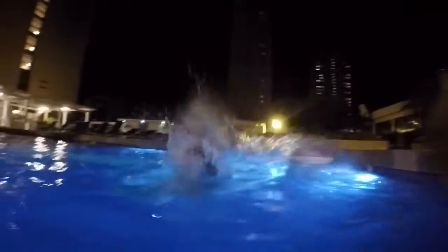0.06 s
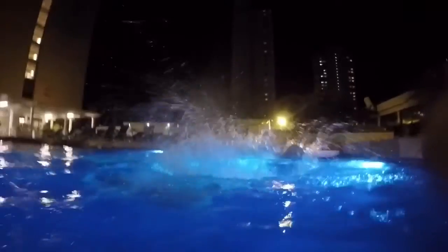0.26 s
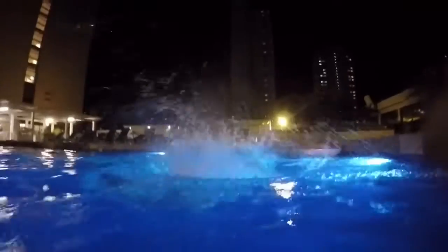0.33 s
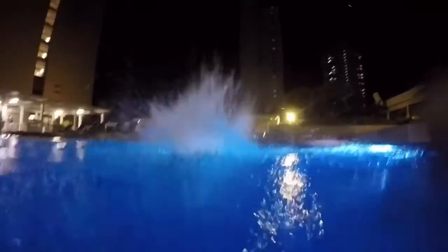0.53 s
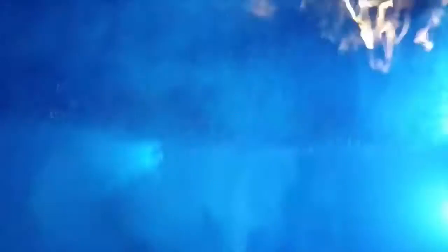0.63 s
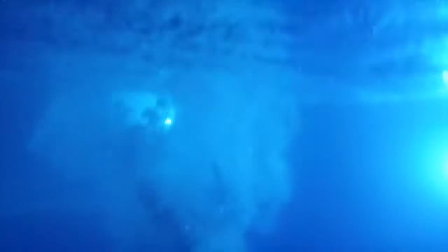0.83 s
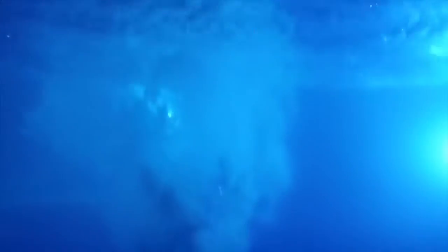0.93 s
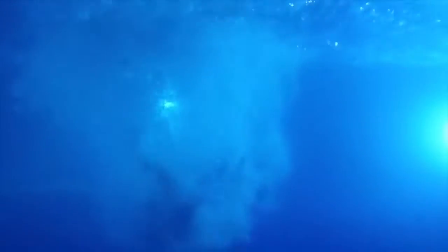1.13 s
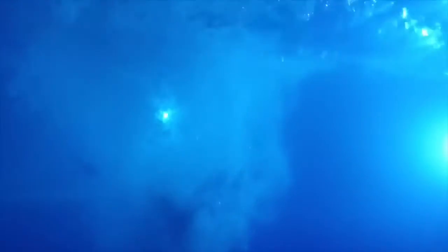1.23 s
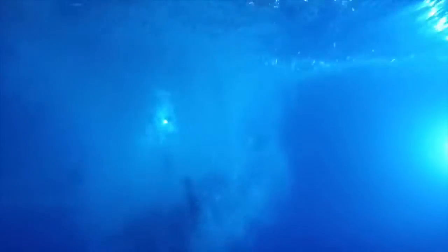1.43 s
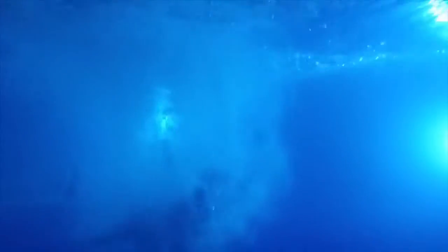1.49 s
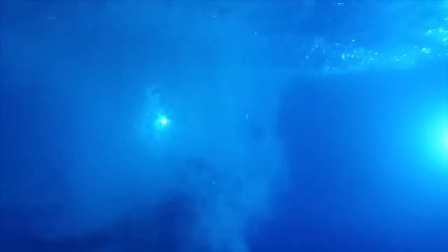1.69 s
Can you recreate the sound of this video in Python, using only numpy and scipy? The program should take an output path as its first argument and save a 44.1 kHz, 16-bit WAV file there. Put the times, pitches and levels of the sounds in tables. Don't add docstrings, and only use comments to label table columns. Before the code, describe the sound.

Pool splash at very close range: rushing spray, then thudding, clicking water slaps that overload the cased microphone, a gulp of trapped air as it submerges, and finally a faint, dull underwater bubbling that slowly grows.

```python
import sys
import numpy as np
from scipy import signal
from scipy.fft import rfft, irfft
from scipy.io import wavfile
from scipy.ndimage import uniform_filter1d, map_coordinates

SR = 44100
rng = np.random.default_rng(int(sys.argv[2]) if len(sys.argv) > 2 else 0)


def master_out(mix):
    frames = np.transpose(np.atleast_2d(mix))
    ceiling = np.clip(frames, -1, 1)
    pcm = np.round(ceiling * 32767).astype(np.int16)
    wavfile.write(sys.argv[1], SR, pcm)


def invert_db(level):
    return 10 ** (np.asarray(level, dtype=float) / 20)


N = 77175


def unit(x):
    return x / np.sqrt(np.mean(x ** 2) + 1e-20)


def along(points, hz):
    f, value = np.transpose(points)
    return np.interp(np.log(hz + 1), np.log(f + 1), value)


def level(s, db):
    times = np.r_[s[0] - .1, s, s[-1] + .1]
    return invert_db(np.interp(np.arange(N) / SR, times, np.r_[-90, db, -90]))


def wobble(rate):
    knots = rng.standard_normal(int(N * rate / SR) + 4)
    return map_coordinates(knots, [np.arange(N) * rate / SR])


def wash(tone, side, patchy_db):
    z = signal.stft(rng.standard_normal((2, N)), nperseg=256)[2]
    field = uniform_filter1d(rng.standard_normal(z.shape[1:]), size=3, axis=0)
    field = uniform_filter1d(field, size=6, axis=1)
    pair = signal.istft(z * invert_db(patchy_db * unit(field)), nperseg=256)[1][:, :N]
    hz = np.fft.rfftfreq(N, 1 / SR)
    pair = irfft(rfft(pair) * invert_db(along(tone, hz) + [0 * hz, along(side, hz)]), N)
    return pair / np.sqrt(np.mean(pair[0] ** 2))


def rings(s, db, hz, t60, swell, glide=0.):
    t = np.arange(int(min(np.max(t60), .4) * SR)) / SR
    s, db, hz, t60 = (np.reshape(v, (-1, 1)) for v in (s, db, hz, t60))
    shape = (1 - np.exp(-(t * hz / swell) ** 2)) * invert_db(db - 60 * t / t60)
    shape *= invert_db(db) / shape.max(axis=1, keepdims=True)
    wave = shape * np.sin(2 * np.pi * hz * t * (1 + glide * t / t60))
    at = (s * SR).astype(int) + np.arange(len(t))
    return np.bincount(at.ravel(), wave.ravel(), N + SR)[:N]


def swarm(count, hz, spread, cycles, scatter_db, t0, t1):
    u, g = rng.random((count, 2)), rng.standard_normal(count)
    f = hz * np.exp(spread * np.clip(g, -2, 2))
    start = t0 + (t1 - t0) * u[:, 0]
    db = -scatter_db * np.log(1 - u[:, 1])
    x = rings(start, db, f, 2 * cycles / f, swell=1.9, glide=0.033)
    return unit(x) * np.sqrt((t1 - t0) * SR / N)


def bursts(s, db, t60, tone, rise_s):
    spikes = np.bincount((s * SR).astype(int), invert_db(db), N)
    t = np.arange(SR // 20) / SR
    decay = invert_db(-60 * t / t60) * (1 - np.exp(-(t / rise_s) ** 2))
    shape = np.convolve(spikes, decay)[:N]
    return shape * invert_db(4 * wobble(500)) * wash(tone, [(1000, 0)], patchy_db=3)


# t/s, wash level/dB, treble level/dB
SPRAY = [(0, -28.5, 2.5), (.21, -31.5, 1), (0.239, -28.5, -20.5), (.3, -37.5, -4), (0.401, -20.5, -12),
         (.42, -26.5, -12.5), (.443, -25.5, -12), (0.461, -22.5, -5), (.5, -25, -8), (.62, -35, -9),
         (0.701, -44, -4.5), (0.779, -51.5, -14.5), (.88, -63.5, -10.5), (1.001, -66.5, -2)]
# f/Hz, density/dB per Hz
SPRAY_TONE = [(300, -19), (600, 1.5), (1050, -4.5), (2100, 2.5), (2900, -8.5), (3600, -57.5)]
HISS_TONE = [(2600, -30), (3300, 1.5), (7000, -7), (9500, -22), (15000, -32), (16000, -83.5)]
# f/Hz, side over mid/dB
SPRAY_SIDE = [(550, -2.5), (1080, 12.5), (1900, -4), (6000, 2)]


def spray():
    s, db, treble_db = np.transpose(SPRAY)
    drops = invert_db(-3.5) * np.array([swarm(count=260, hz=1839, spread=.3, cycles=8.7, scatter_db=3.5,
                                        t0=0.19, t1=.9) for port in range(2)])
    fizz = invert_db(-13.0) * swarm(count=90, hz=5600, spread=0.39, cycles=11, scatter_db=5.0, t0=0.27, t1=0.67)
    hiss = wash(HISS_TONE, SPRAY_SIDE, patchy_db=4.0) + fizz * [[1], [-1]]
    hiss = level(s, db + treble_db - 11.0) * hiss
    body = level(s, db) * (wash(SPRAY_TONE, SPRAY_SIDE, patchy_db=3.0) + drops)
    choppy_db = np.where(np.arange(N) / SR < s[1], 1.5, 2.5)
    return invert_db(choppy_db * wobble(55.07)) * (body + hiss)


# t/s, level/dB
CHURN = [(0, -29.5), (.2, -23), (.25, -19.5), (0.295, -22), (0.359, -13.5), (0.411, -13.5), (.44, -20),
         (.47, -18), (0.581, -19.5), (0.629, -22.5), (.72, -36), (.8, -27), (.95, -43), (1.202, -38.5),
         (1.75, -36.5)]
# f/Hz, density/dB per Hz
CHURN_TONE = [(15, -10.5), (40, -6.5), (180, -7), (320, -8.5), (500, -23.5), (900, -85.5)]
# f/Hz, side over mid/dB
CHURN_SIDE = [(40, -29), (250, -13.5), (500, -2)]


def churn():
    above = np.clip((.95 - np.arange(N) / SR) * 10, 0, 1)
    lumps = invert_db(2.4 * wobble(30))
    surge = level(*np.transpose(CHURN)) * lumps
    return surge * wash(CHURN_TONE, CHURN_SIDE, patchy_db=2.44) * [1 + 0 * above, above]


# t/s, peak level/dB, f/Hz
PLINKS = [(0.179, -17.5, 2180), (0.205, -4, 1960), (0.217, 0, 1727), (.219, -9.5, 661), (0.224, -12, 1674),
          (.243, -11, 1845), (0.255, -6, 1016), (0.264, -5, 1670), (0.271, -8, 1075), (0.283, -16, 1950),
          (0.303, -14.5, 1154), (.328, -23, 2270), (0.335, -6.5, 1510), (0.337, -4, 2187),
          (0.3699, -15, 1940), (0.381, -14, 1920), (.4, -10, 1700), (0.406, -2, 1700), (0.409, -1, 2250),
          (0.4483, -12.5, 2570), (0.452, 1.5, 1894), (0.458, 0.5, 2020), (0.468, -6, 2860),
          (.476, -5, 1970), (0.4876, 2, 2410), (.501, -12.5, 1900), (0.511, -8, 1780), (0.5503, -16, 1600),
          (.553, -14, 722), (0.564, -10, 814), (0.586, -5.5, 875), (0.615, -14.5, 1023),
          (0.638, -10.5, 1730), (0.661, -8, 961), (0.714, -38, 1270), (0.731, -24, 2577),
          (0.7444, -17, 1260), (0.762, -31, 2130), (.797, -30.5, 2620), (0.861, -34, 2300),
          (0.762, -19.5, 1610), (0.8, -21.5, 1806), (0.849, -18, 1857), (0.864, -19.5, 1490),
          (0.915, -15.5, 1476), (0.961, -22, 1793)]
# t/s, peak level/dB, f/Hz
ROCKS = [(0.217, 4, 862), (.255, -2.5, 1034), (0.262, 0, 974), (0.27, -0.5, 973), (0.303, -4.5, 1045),
         (.332, -13, 870), (0.339, -2, 1165), (0.357, -9.5, 903), (.374, -15, 795), (.400, -4.5, 961),
         (.408, -3, 805), (0.414, 3, 1070), (.451, -8.5, 1136), (0.469, -5.5, 336), (0.511, 4, 1092),
         (0.567, -2, 877), (0.587, -5.5, 838), (.657, -2, 683), (0.664, -15, 306), (.744, -12.5, 570),
         (.866, -12.5, 913)]
# t/s, peak level/dB, f/Hz
THUDS = [(0.2195, 0.5, 209.4), (0.2248, -5, 188), (.237, -11, 176), (0.2549, -9, 172), (0.2678, 1.5, 181),
         (0.306, -19, 170), (0.337, -10, 394), (0.35, -7.5, 203), (0.362, -6.5, 317), (0.382, -11.5, 306),
         (0.39, -6, 256.3), (0.402, -9, 174.2), (0.409, -0.5, 244), (0.457, -4, 208), (0.5121, -2.5, 207),
         (.525, -13.5, 226), (0.539, -16, 151), (0.565, -4, 173), (0.586, -3.5, 177)]
# t/s, peak level/dB,
# f/Hz, decay T60/s
GULPS = [(.469, -1.5, 305, .07), (.384, -6, 270, .04), (.739, -18, 340, 0.035), (.777, -38, 1760, 0.047),
         (.814, -31, 1100, 0.084), (.868, -23, 1530, 0.04), (.86, -33, 580, 0.24), (.776, -22, 520, 0.1),
         (.82, -21.5, 460, 0.19), (.9, -30.5, 282, 0.34), (1.17, -34, 570, 0.063),
         (1.213, -35.5, 490, 0.066), (1.733, -28.5, 490, 0.046), (1.515, -32, 410, 0.21),
         (1.655, -26.5, 576, 0.043), (.653, -5.5, 318, 0.025), (.659, 6.5, 300.6, 0.061),
         (.744, -4, 425, 0.1), (.748, -10.5, 327, 0.12), (.763, -16, 433, 0.13), (.805, -17, 413, 0.22),
         (.79, -20.5, 189, 0.19), (.95, -27, 503, 0.235), (1.036, -14, 295, 0.086), (1.67, -25, 43, 0.13),
         (.972, -41, 2900, 0.025), (1.013, -53.5, 3400, 0.031), (1.318, -50, 3260, 0.031),
         (1.368, -35, 970, 0.19), (1.43, -28.5, 28, 0.43), (1.54, -23.5, 537, 0.3),
         (1.597, -18.5, 580, 0.11), (1.687, -43, 400, 0.047)]


def slaps():
    s, db, hz = np.transpose(THUDS)
    thuds = rings(s, db, hz, 6 / hz, swell=0.35)
    gulps = rings(*np.transpose(GULPS), swell=0.44) * invert_db(1.1 * wobble(70.4))
    s, db, hz = np.transpose(ROCKS)
    rocking = rings(s, db, hz, 30 / hz, swell=0.59, glide=0.018)
    s, db, hz = np.transpose(PLINKS)
    t60 = 27 / hz
    plinks = rings(s, db - 4.0, hz, t60, swell=2.2, glide=0.0063)
    side_plinks = rings(s, db - 7.0, hz * 0.96, 0.25 * t60, swell=1.2)
    mid = thuds + gulps - 0.22 * rocking + plinks
    side = rocking + side_plinks
    crackle_tone = [(400, -25), (750, -2), (2400, -4), (3600, -22), (9000, -60)]  # f/Hz, dB per Hz
    return np.array([mid, side]) + bursts(s, db - 10, .018, crackle_tone, rise_s=.001)


# t/s, peak level/dB, f/Hz
TICKS = [(0.2174, -12, 4400), (0.255, -22, 4220), (.267, -31, 6130), (.3051, -36, 4050),
         (.3215, -31.5, 3920), (0.3371, -25.5, 3820), (0.3985, -17, 3930), (0.4104, -21, 4590),
         (.414, -28, 4520), (.4512, -25, 4510), (.4635, -18.5, 6410), (.481, -16.5, 5790),
         (.501, -9.5, 5600), (0.4579, -28, 3850), (0.4693, -6.5, 5270), (0.4874, -15.5, 5600),
         (0.4968, -3, 5900), (0.5064, -7.5, 4840), (.511, -23, 6000), (.519, -23.5, 5840),
         (.533, -23.5, 5630), (.56, -27, 6150), (.565, -24.5, 4500), (.595, -28.5, 4350),
         (.612, -35.5, 6500), (.625, -31.5, 3800), (.65, -32.5, 7200), (.702, -42.5, 5600),
         (.729, -38.5, 4330), (.897, -48, 4300), (1.5543, -53, 2800), (1.5733, -48, 3800),
         (1.7025, -41.5, 3000), (0.5392, -28, 4300), (0.5544, -26, 5870), (0.5881, -24, 4290),
         (0.615, -23.5, 3780), (0.6584, -23.5, 4210), (0.8699, -38.5, 4360), (0.9143, -33, 9640)]


def ticks():
    s, db, hz = np.transpose(TICKS)
    ring = rings(s, db - 6.5, hz, 0.011 + 0 * s, swell=1.2)
    wash_tone = [(1500, -21), (3500, 6.0), (8000, 4.5), (10500, -13), (15600, -12), (16000, -78.0)]
    return ring * [[1], [-.7]] + bursts(s, db - 9, 0.015, wash_tone, rise_s=0.00025)


# t/s, level/dB
GURGLE = [
    (.8, -34),
    (.97, -46),
    (1.099, -46),
    (1.3, -40.5),
    (1.449, -35.5),
    (1.551, -32.5),
    (1.75, -31.5),
]
# f/Hz, density/dB per Hz
UNDER_TONE = [(200, -28.5), (330, -14.5), (580, -2), (1000, -20.5), (1300, -31.5), (2100, -37.5),
              (2500, -41.5), (10500, -63), (14500, -73.5)]
# f/Hz, side over mid/dB
UNDER_SIDE = [(300, -57), (600, -54), (1100, -14), (2500, -28.5)]


def gurgle():
    big = swarm(count=160, hz=590.3, spread=.07, cycles=100, scatter_db=2.5, t0=0.66, t1=2.4)
    small = sum(swarm(count=240, hz=hz, spread=.035, cycles=30, scatter_db=1.5, t0=.9, t1=1.74)
                for hz in (1600, 2050))
    both = invert_db(-7) * big + invert_db(-23) * small
    muffled = wash(UNDER_TONE, UNDER_SIDE, patchy_db=2.5) + [both, 0 * both]
    return level(*np.transpose(GURGLE)) * invert_db(1.3 * wobble(33)) * muffled


# f/Hz, density/dB per Hz
FLOOR_TONE = [(3000, -29.5), (7000, -7), (10000, 3), (12500, -9.5), (14000, -41)]


def input_hiss():
    return level([1, N / SR], [-81, -72]) * wash(FLOOR_TONE, UNDER_SIDE, patchy_db=2.0)


def scene():
    mid, side = spray() + churn() + slaps() + ticks() + gurgle() + input_hiss()
    return np.array([mid + side, mid - side])


def top_cut(x):
    return signal.sosfilt(signal.butter(12, 15800, fs=SR, output="sos"), x)


def record(dry):
    top, hardness = .999, 12
    hot = dry / (1 + np.abs(dry / top) ** hardness) ** (1 / hardness)
    return top_cut(hot)


dry = scene()
out = record(dry)
master_out(out)
```